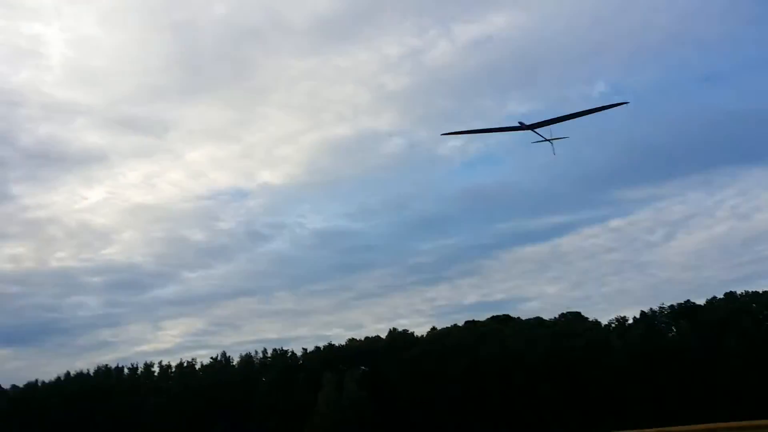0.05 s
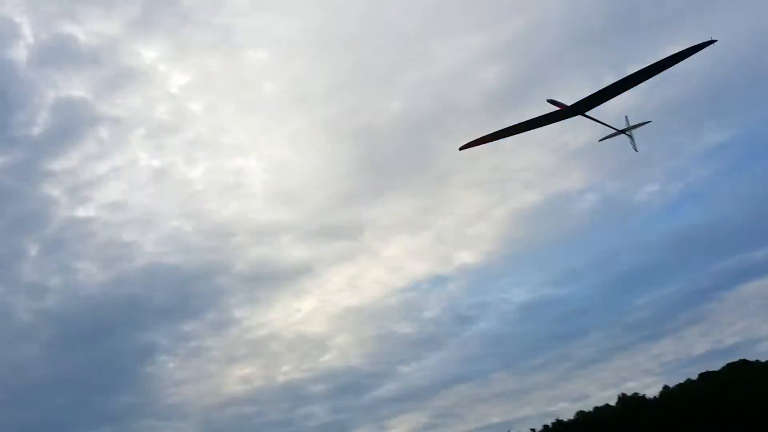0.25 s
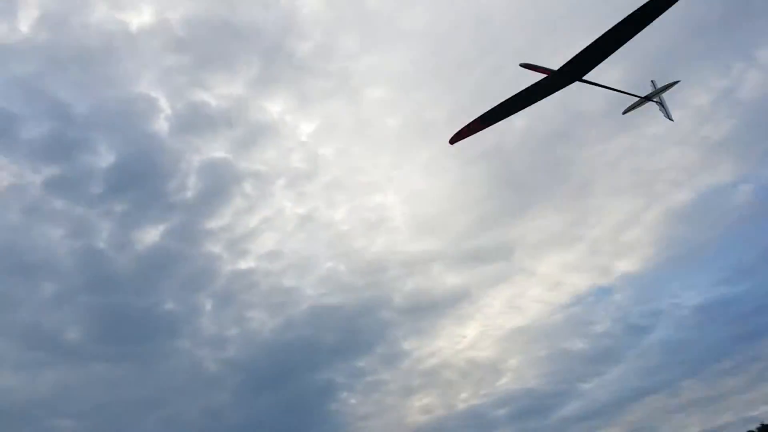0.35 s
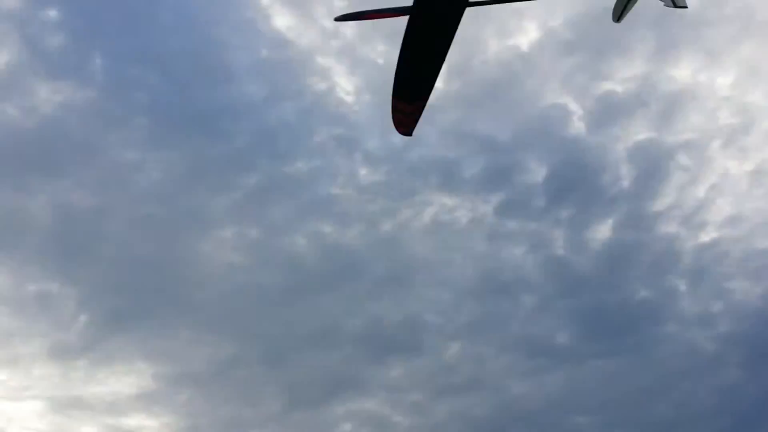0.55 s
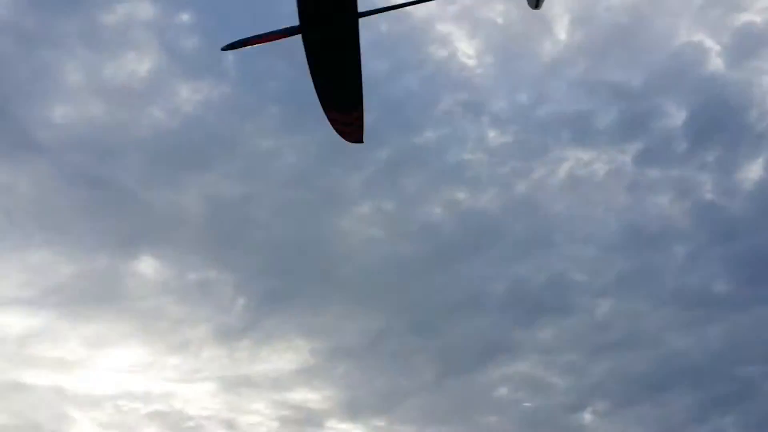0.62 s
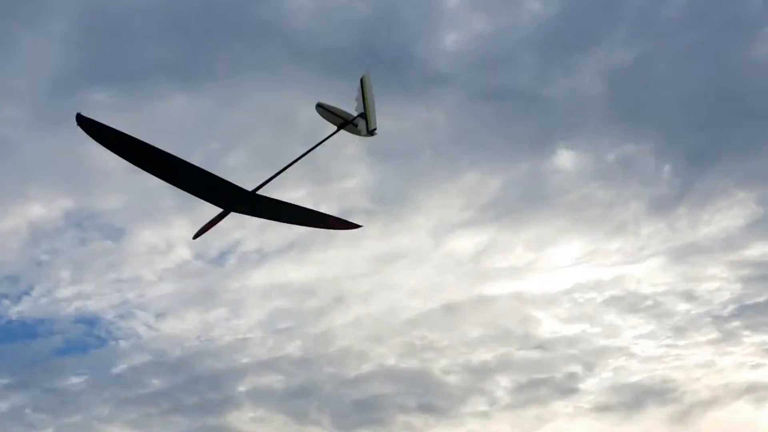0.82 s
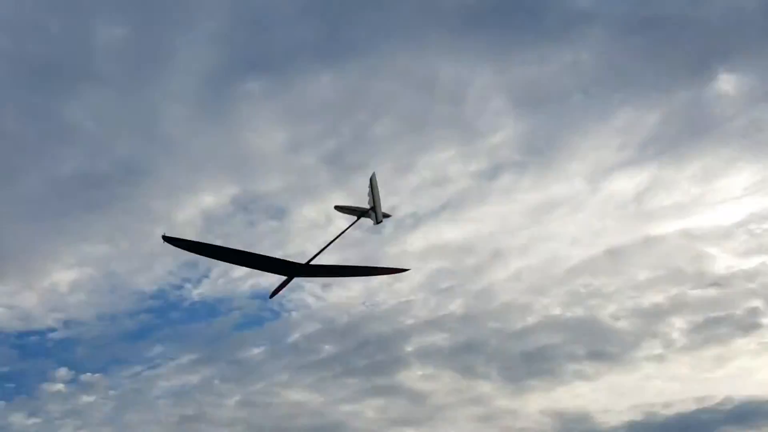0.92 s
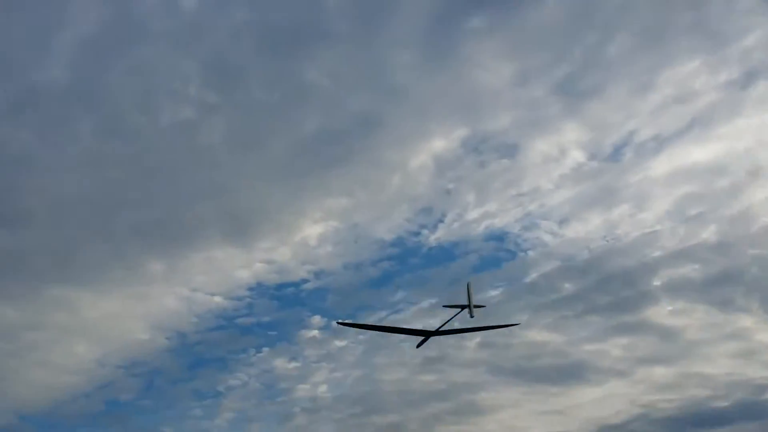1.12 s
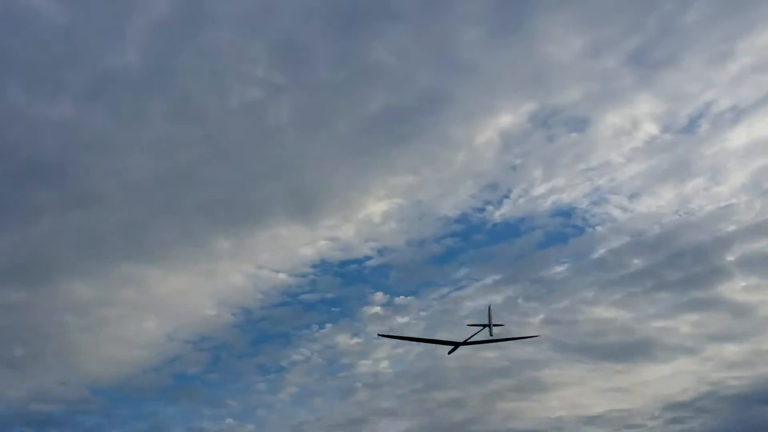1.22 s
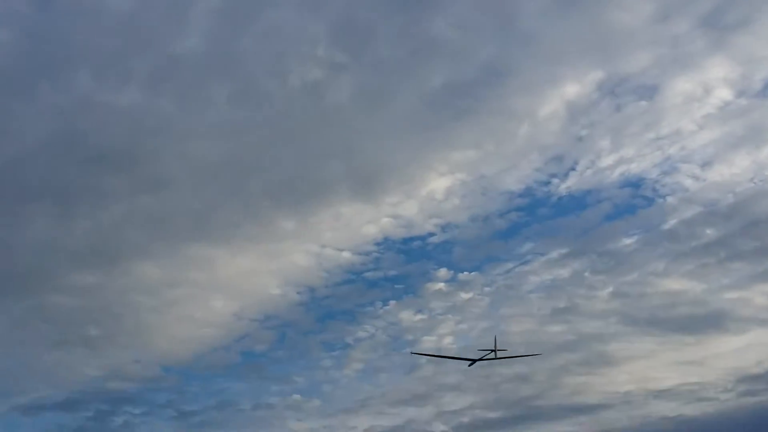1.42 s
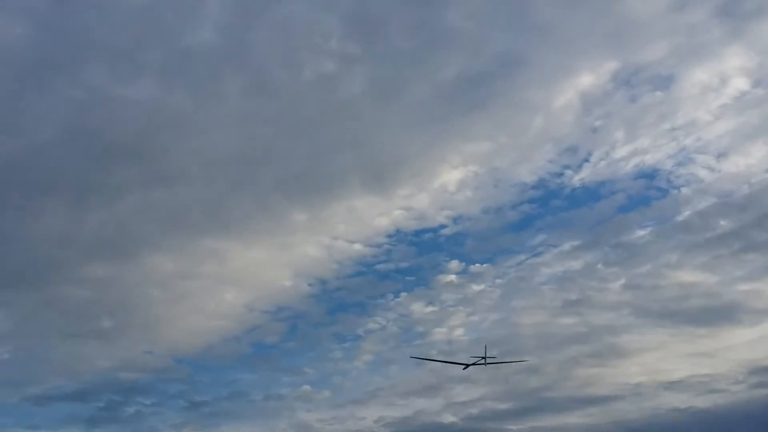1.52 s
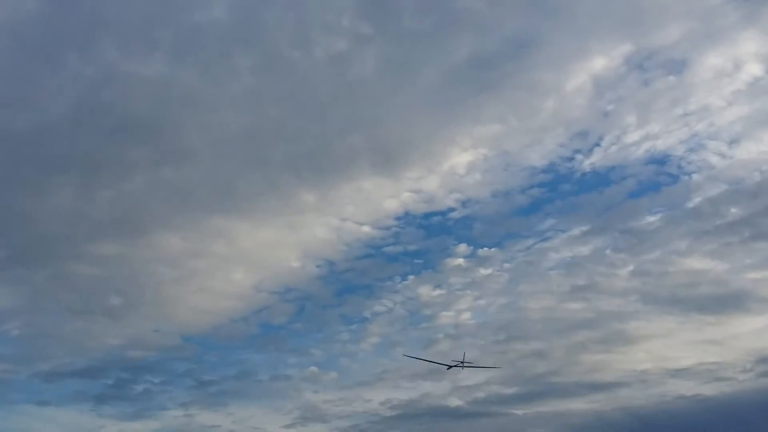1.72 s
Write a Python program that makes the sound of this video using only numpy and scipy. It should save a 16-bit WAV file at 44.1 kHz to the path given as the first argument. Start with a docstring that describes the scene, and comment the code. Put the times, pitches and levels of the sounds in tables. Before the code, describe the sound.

A model glider passes close overhead outdoors with a soft, hissing whoosh and a throbbing hum that drops slightly in pitch. A few tiny ticks sound early, then puffs of air hit the microphone as it glides away into faint wind.

```python
"""A model glider swoops low over the microphone in an open field and glides away.
Air passing its edges sings three low tones that beat together, sink in pitch and fade in and out
against their echo off the ground, inside a whoosh and a hiss. Its wake and puffs of air bump the
microphone's two openings (ports). There are a few tiny ticks, a short rustle and faint wind."""
import sys
import numpy as np
from scipy import signal
from scipy.fft import rfft, irfft
from scipy.io import wavfile
from scipy.ndimage import uniform_filter1d, map_coordinates

SR = 44100
rng = np.random.default_rng(int(sys.argv[2]) if len(sys.argv) > 2 else 0)


def wav_out(sig):
    """Save sig, one row per channel (or a flat mono array), as 16-bit PCM at SR to the path in sys.argv[1]."""
    wavfile.write(sys.argv[1], SR, np.round(np.clip(np.atleast_2d(sig).T, -1, 1) * 32767).astype(np.int16))


N = 77175
T = np.arange(N) / SR

# The low, middle and high tone in Hz, before motion bends their pitch.
EDGE_TONES_HZ = [278.5, 320.5, 344.5]
# How loud each part of the glider is, before the echo. Each row: time in seconds, level in dB.
LOW_TONE_LEVEL = [(0, -72), (.1, -65.5), (.2, -55), (.4, -54.5), (.5, -48.5), (.7, -44.5), (.8, -46.5),
                  (.95, -52), (1.05, -63), (1.2, -77), (1.35, -90), (1.75, -105)]
MIDDLE_TONE_LEVEL = [(0, -68.5), (.3, -62.5), (.45, -60.5), (.7, -59.5), (.85, -61), (1.05, -63),
                     (1.2, -90), (1.75, -100)]
HIGH_TONE_LEVEL = [(0, -72.5), (.25, -61.5), (.47, -62), (.61, -50), (.73, -61.5), (.85, -54.5), (1.0, -67),
                   (1.17, -74), (1.4, -86.5), (1.75, -100)]
OVERTONE_LEVEL = [(0, -71.5), (.2, -71), (.35, -63.5), (.52, -53.5), (.65, -55), (.8, -58), (.93, -69),
                  (1.2, -89), (1.75, -100)]
WHOOSH_LEVEL = [(0, -69.5), (.17, -66.5), (.33, -61), (.5, -55), (.62, -52.5), (.78, -55.5), (.92, -59),
                (1.05, -68), (1.25, -77), (1.45, -89), (1.75, -99)]
HISS_LEVEL = [(0, -73), (.2, -67), (.45, -63.5), (.65, -61.5), (.8, -59), (.89, -60.5), (.95, -59.5),
              (1.04, -66.5), (1.2, -69.5), (1.4, -78), (1.75, -88)]
# The glider's direction. Each row: time in seconds, how late the left port hears it in milliseconds.
LEFT_LAG = [(0, .07), (.3, .15), (.7, -.03), (1.05, .12), (1.3, .25)]
# Air hitting the ports. Each row: middle and half-length in seconds, left and right level in dB.
WAKE_SLAPS = [(.8425, .0022, -35, -63), (.928, 0.0021, -69, -39)]
AIR_PUFFS = [(0.533, 0.049, -63, -66), (.75, .04, -66, -65), (0.831, 0.016, -47, -62),
             (.875, 0.027, -53, -52), (0.963, 0.034, -64, -59.5), (1.135, 0.017, -62, -53),
             (1.23, 0.034, -72, -58.5), (1.42, 0.016, -88, -65), (1.502, 0.011, -87, -63.5)]
# Tiny snaps. Each row: start in seconds, peak in dB before panning, ringing pitch in Hz.
TICKS = [(.291, -52, 9000), (0.31, -40, 13500), (.3266, -36.5, 13300), (0.3293, -53, 13200),
         (0.332, -49, 12400), (.345, -46, 13000), (.355, -54, 13000), (0.39, -52, 10000)]
# The mix of bass and treble in each noise. Each row: frequency in Hz, relative strength in dB.
WHOOSH_COLOUR = [(60, -8), (130, -7.5), (200, -6.5), (300, -4.5), (400, 1.5), (480, -4), (570, 0),
                 (680, -6.5), (780, -5), (1000, -8), (1300, -14.5), (1700, -20.5), (2300, -24),
                 (5000, -39.5), (16000, -60)]
HISS_COLOUR = [(60, -5), (400, 7.5), (900, 10.5), (1400, 5.5), (1900, 5), (2500, 1.5), (3300, 2), (4500, 0),
               (7000, -2), (8600, 3), (11000, -1.5), (16000, -2.5)]
PUFF_COLOUR = [(25, -0.5), (45, 4.5), (70, 3.5), (100, 1), (160, -11), (250, -23), (500, -41), (2000, -76),
               (16000, -94)]
RUSTLE_COLOUR = [(60, 4), (150, 11), (400, 10), (800, 17.5), (1300, 8.5), (1900, 1), (2800, 5),
                 (6000, -8.5), (10500, 8), (16000, -1.5)]
BACKGROUND_COLOUR = [(25, -1.5), (70, 6), (130, -0.5), (220, 3.5), (330, -5.5), (600, -4), (800, -1),
                     (1100, -12), (1600, -13.5), (2100, -17.5), (3200, -17), (6500, -18.5), (9000, -20),
                     (16000, -19.5)]
# How alike a noise is at the two ports. Each row: frequency in Hz, likeness from 0 to 1.
NEAR_LIKENESS = [(40, 0.9), (200, 0.73), (400, 0.82), (700, 0.86), (1300, 0.12), (2400, 0.1), (4400, 0.03),
                 (16000, 0)]
BACKGROUND_LIKENESS = [(30, 0.012), (120, 0.81), (250, 0.82), (700, 0.31), (1500, 0), (3000, 0),
                       (16000, 0.17)]
# The treble ring of the left port. Each row: frequency in Hz, boost in dB.
LEFT_PORT_RING = [(900, 0), (1300, 3), (2000, -1.5), (3200, 0), (4300, 5.5), (5200, 9), (6300, 17.5),
                  (7100, 10.5), (8200, 1.5), (9500, -0.5), (16000, 0)]

PASS_S, PASS_WIDTH_S, DOPPLER_SHARE = .67, .31, .045   # middle, half-length and depth of the pitch fall
WAVER_HZ, WAVER_DB, WAVER_RADIANS = 20.6, .97, .12   # unsteadiness of each tone
OVERHEAD_S, OVERHEAD_WIDTH_S, ECHO_LAG_S = .61, .42, .0065   # time, half-length and size of the peak lag


def glider():
    """Air flowing past the glider makes three tones, their overtones, a whoosh and a hiss of the wings."""
    clock = glider_clock()
    voices = [edge_tone(clock, hz) for hz in EDGE_TONES_HZ]
    levels = (LOW_TONE_LEVEL, MIDDLE_TONE_LEVEL, HIGH_TONE_LEVEL)
    tones = sum(level(rows) * rms_one(voice.real) for rows, voice in zip(levels, voices))
    flow = rms_one(sum(voices))   # its size rises and falls as the tones beat
    rush = whoosh(clock, flow) + overtones(flow)
    hiss = level(HISS_LEVEL) * air(HISS_COLOUR, NEAR_LIKENESS)
    return over_ground([tones, tones], echo_share=.69) + over_ground(rush + hiss, echo_share=.1)


def glider_clock():
    """The glider's time as heard: fast as it nears, slow as it leaves, so the pitch falls (Doppler)."""
    since_pass = T - PASS_S
    return np.cumsum(1 - DOPPLER_SHARE * since_pass / np.hypot(since_pass, PASS_WIDTH_S)) / SR


def edge_tone(clock, hz):
    """Swirls of air peel off an edge at a regular rate: a clean tone that wavers slightly."""
    loudness = from_db(WAVER_DB * drift(WAVER_HZ))
    phase = 2 * np.pi * hz * clock + WAVER_RADIANS * drift(WAVER_HZ)
    return loudness * np.exp(1j * phase)


def whoosh(clock, flow, throb_share=.2):
    """Rushing air that sinks in pitch with the tones and throbs with their beats."""
    noise = air(WHOOSH_COLOUR, NEAR_LIKENESS, size=2 * N)
    sinking = np.array([map_coordinates(side, [clock * SR], order=3) for side in noise])
    throb = 1 + throb_share * (np.abs(flow) - 1)
    return level(WHOOSH_LEVEL) * rms_one(sinking * throb)


def overtones(flow, triple_db=-14, waver_db=2.5, waver_hz=30.2):
    """The tones mix into higher ones, near twice and three times their pitch."""
    turn = flow / (np.abs(flow) + 1e-6)   # multiplying by this adds the pitch once more
    double = rms_one((flow * turn).real)
    triple = from_db(triple_db) * rms_one((flow * turn * turn).real)
    waver = from_db(waver_db * drift(waver_hz))
    return level(OVERTONE_LEVEL) * rms_one((double + triple) * waver)


def over_ground(sound, echo_share):
    """Add the bounce off the ground, which lags most overhead; one port hears both a little later."""
    echo_lag_s = ECHO_LAG_S * OVERHEAD_WIDTH_S / np.hypot(T - OVERHEAD_S, OVERHEAD_WIDTH_S)
    left, right = (side + echo_share * delayed(side, echo_lag_s) for side in sound)
    left_lag_s = np.interp(T, *np.transpose(LEFT_LAG)) / 1000
    return np.array([delayed(left, left_lag_s), right])


def wake_slaps():
    """Swirls behind the glider cross the ports: a quick swing of pressure, opposite on the two sides."""
    out = np.zeros((2, N))
    for s, half_s, left_db, right_db in WAKE_SLAPS:
        swing = (s - T) / half_s * swell(s, half_s) * np.exp(.5)   # peaks at 1
        out += from_db([[left_db], [right_db]]) * swing
    return out * [[-1], [1]]


def puffs():
    """Low bumps of moving air, different at each port."""
    push = sum(swell(s, half_s) * from_db([[left], [right]]) for s, half_s, left, right in AIR_PUFFS)
    rumble = air(PUFF_COLOUR, likeness=[(20, 0), (20000, 0)])
    power = uniform_filter1d(rumble ** 2, 1300)
    return push * rumble / np.sqrt(power + 1e-12)   # even out the rumble's own ups and downs


def ticks(rasp_db=-12, decay_s=.0005, width_hz=3300, pan_db=2.5):
    """Very short, bright snaps with a faint rasp, a little to the right."""
    out = np.zeros((2, N))
    for s, db, hz in TICKS:
        fade = (T >= s) * np.exp(-np.abs(T - s) / decay_s)
        burst = from_db(rasp_db) * fade * rng.standard_normal((2, N))
        burst[:, int(s * SR)] += 1   # the click itself
        snap = resonance(resonance(burst, hz, width_hz), hz, 2 * width_hz)
        out += from_db(db) * snap / np.abs(snap).max(axis=1, keepdims=True)
    return out * from_db([[-pan_db], [pan_db]])


def rustle(db=-60.5, grain_db=4):
    """A short, grainy brush of noise near the microphone."""
    grains = rms_one(from_db(grain_db * drift(hz=150)))
    return from_db(db) * swell(s=1.147, half_s=.02) * grains * air(RUSTLE_COLOUR, NEAR_LIKENESS)


def background(db=-68):
    """Distant wind and steady microphone hiss."""
    return from_db(db) * air(BACKGROUND_COLOUR, BACKGROUND_LIKENESS)


def air(colour, likeness, size=N):
    """Stereo noise of a given colour and left-right likeness, with average power 1."""
    hz = np.arange(size // 2 + 1) * SR / size
    shared, opposed = rfft(rng.standard_normal((2, size)))
    alike = np.clip(at_hz(likeness, hz), 0, 1)
    both = np.sqrt(1 + alike) * shared + np.sqrt(1 - alike) * opposed * [[1], [-1]]
    return rms_one(irfft(both * from_db(at_hz(colour, hz)) * (hz > 20), size))


def from_db(db):
    """Turn decibels into a number to multiply by."""
    return 10 ** (np.asarray(db) / 20)


def rms_one(x):
    """Scale a signal to an average power of 1."""
    return x / np.sqrt(np.mean(np.abs(x) ** 2) + 1e-20)


def level(rows):
    """Join rows of seconds and dB into a volume curve."""
    return from_db(np.interp(T, *np.transpose(rows)))


def at_hz(rows, hz):
    """Read between a table's rows, giving each octave equal room."""
    row_hz, value = np.transpose(rows)
    return np.interp(np.log(hz + 1), np.log(row_hz), value)


def swell(s, half_s):
    """A bell-shaped rise and fall."""
    return np.exp(-.5 * ((T - s) / half_s) ** 2)


def drift(hz):
    """A smooth random wobble of about size 1, mostly slower than hz."""
    low_pass = signal.butter(2, hz, fs=SR, output="sos")
    return rms_one(signal.sosfilt(low_pass, rng.standard_normal(N + SR))[SR:])


def resonance(x, hz, width_hz):
    """Make a sound ring around one pitch."""
    r = np.exp(-np.pi * width_hz / SR)
    feedback = [1, -2 * r * np.cos(2 * np.pi * hz / SR), r * r]
    return signal.lfilter(np.array([1, 0, -1]) * (1 - r * r) / 2, feedback, x + 1e-18)


def delayed(x, lag_s):
    """Play a sound late by a changing lag."""
    return map_coordinates(x, [(T - lag_s) * SR], order=3, mode="nearest")


def scene():
    """The glider and the small near sounds over the quiet field."""
    return glider() + wake_slaps() + puffs() + rustle() + ticks() + background()


def record(dry, cutoff_hz=15750):
    """The left port rings in the treble; the very highest sounds are cut on both sides."""
    hz = np.arange(N + 1) * SR / (2 * N)
    left = irfft(rfft(dry[0], 2 * N) * from_db(at_hz(LEFT_PORT_RING, hz)))[:N]
    low_pass = signal.firwin(301, cutoff_hz, fs=SR, window="blackman")
    return np.array([np.convolve(side, low_pass, "same") for side in (left, dry[1])])


dry = scene()
out = record(dry)
wav_out(out)
```